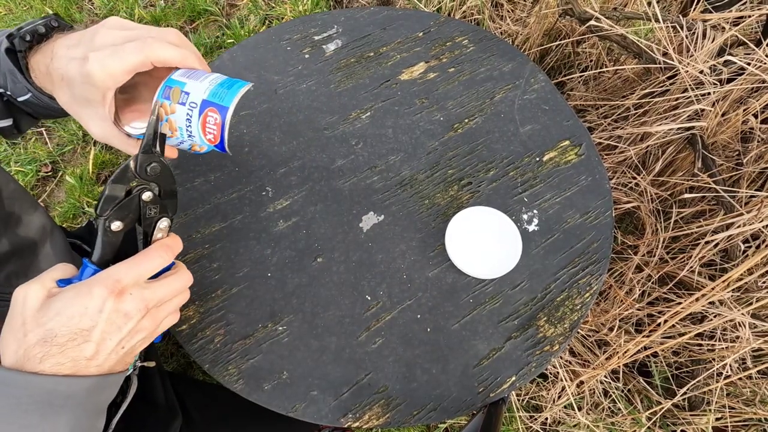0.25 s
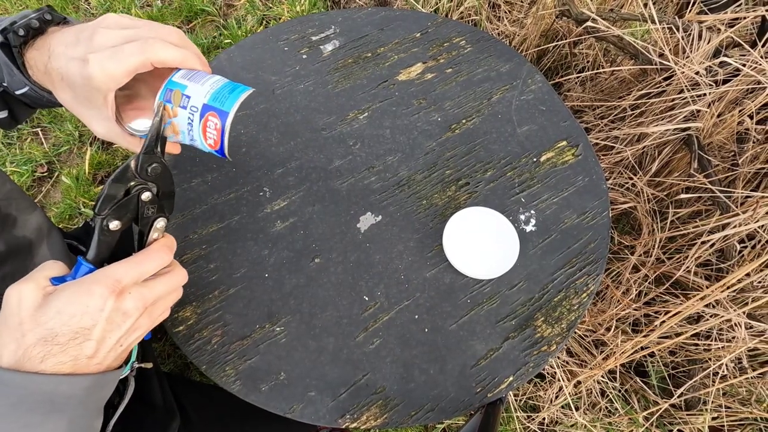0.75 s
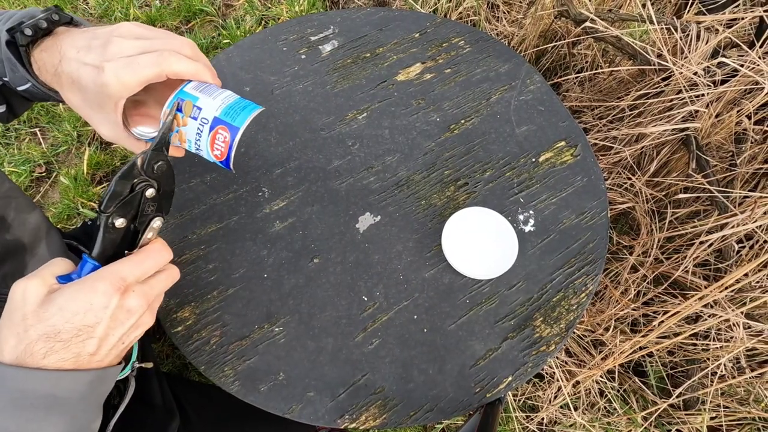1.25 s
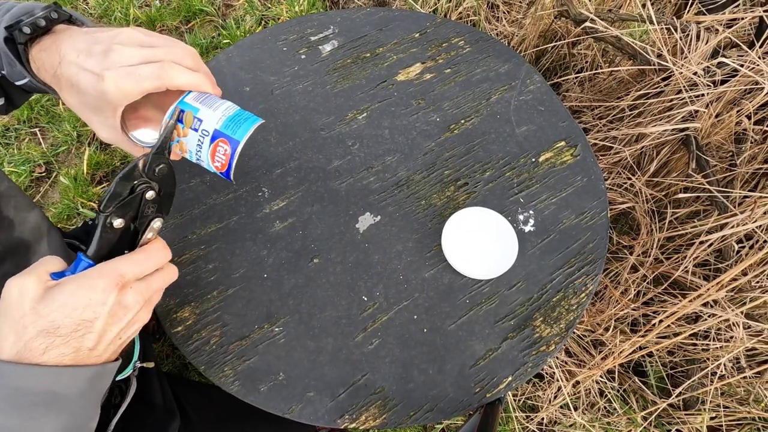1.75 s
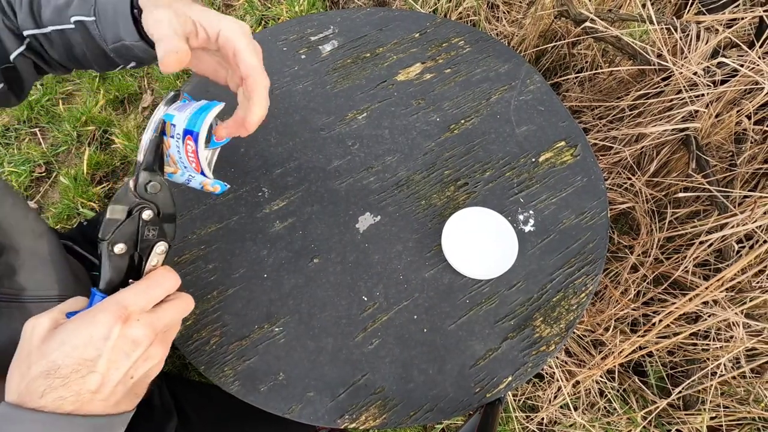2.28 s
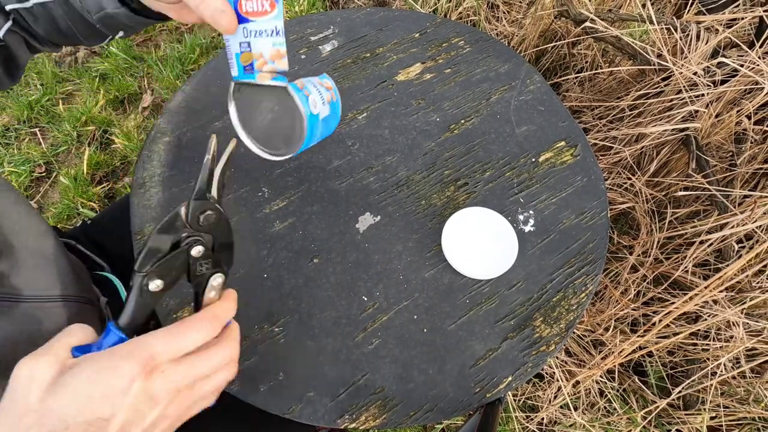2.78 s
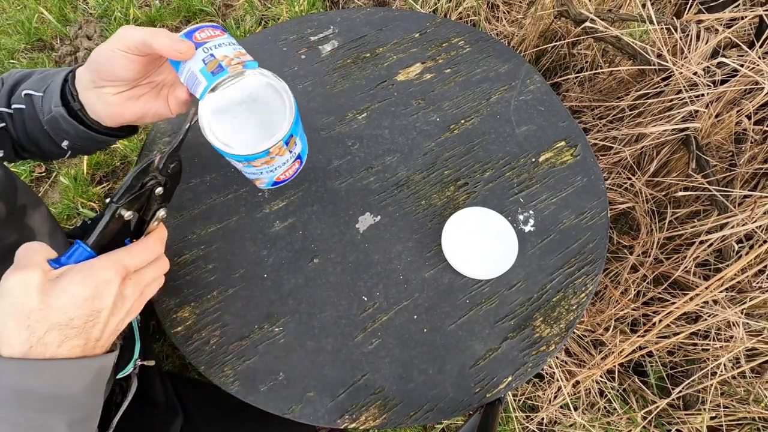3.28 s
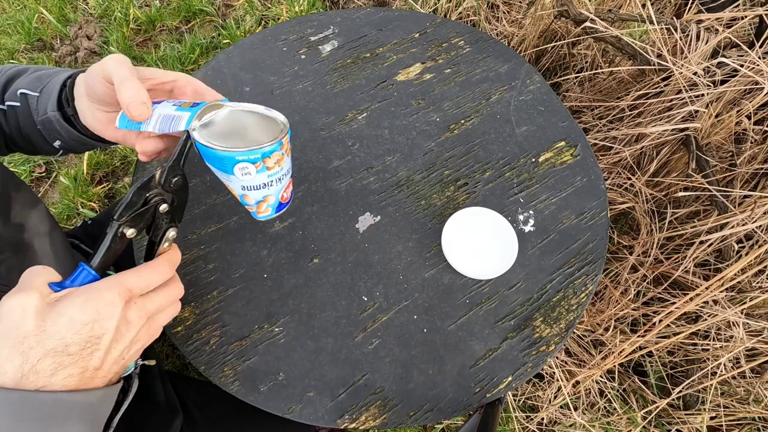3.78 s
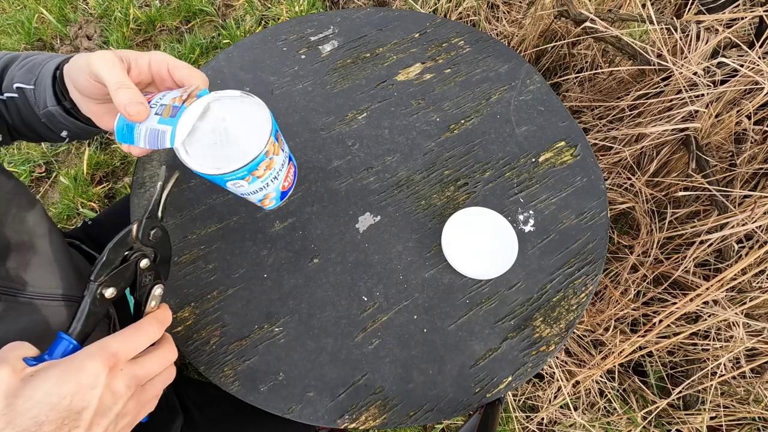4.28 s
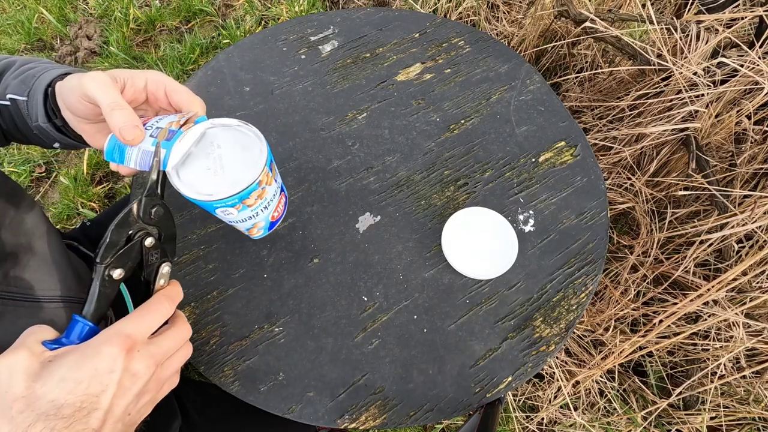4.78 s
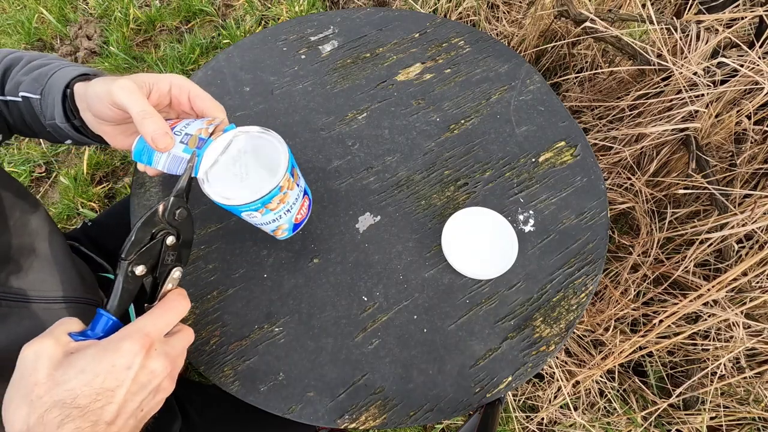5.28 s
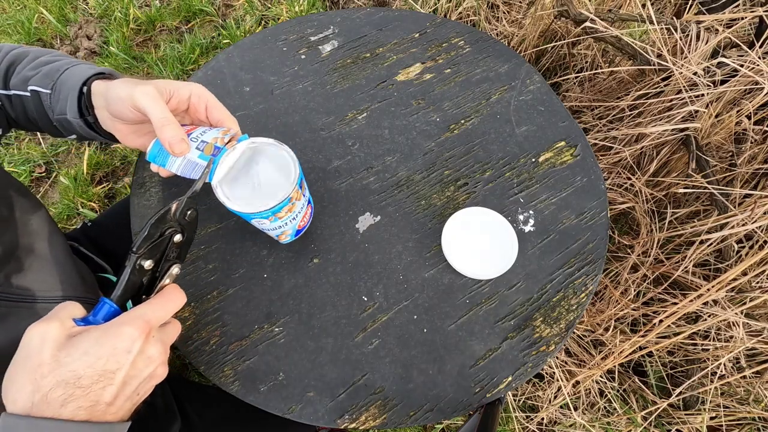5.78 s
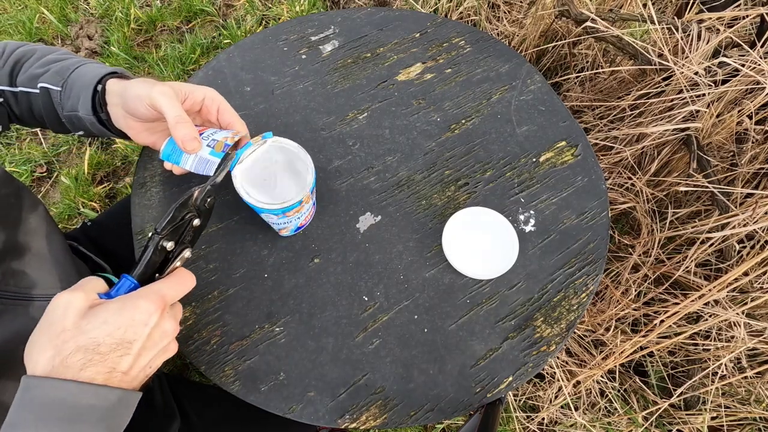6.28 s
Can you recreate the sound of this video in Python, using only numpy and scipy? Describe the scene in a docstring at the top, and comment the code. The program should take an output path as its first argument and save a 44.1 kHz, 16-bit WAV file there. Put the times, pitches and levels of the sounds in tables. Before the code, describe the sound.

A close outdoor scene of snips cutting a thin steel can above a wooden table, over soft distant tyre roar, low rumble and faint hiss. From 0.1 to 1.6 s come dry, irregular jaw clacks with little scrapes; the hardest, near 0.67, 0.86 and 1.45 s, are piercing, the first with a thump in the handles. A faint rub follows at 1.9 s. From 2.1 to 4.2 s it is mostly quiet: tiny crinkles, light rubbing, hollow tin pops, clearest at 3.3 and 4.0 s. The road dips around 2.5 s, then slowly swells, and the stereo widens from near mono. A small crack and shear comes at 4.7 s, lighter ones at 5.2, then strong crunching cracks at 5.6 and 6.05 s. From 6.2 s the can drops, bouncing and rattling until the end, hardest near 6.37 s, with short dull table booms slightly right.

```python
"""Tin snips on a can

Tin snips cut a strip from a thin steel can, outdoors, close over a wooden table.
Jaw clacks, sheet cracks and wall buckles are coloured noise bursts over damped ringing modes.
Scrapes and shears are clumps of stick-slip ticks and hiss, heard through the sheet's shimmer.
At last the can drops and bounces: its rim rattles and the table top booms.
Behind lies shaped noise: the tyre roar of a far road, a low rumble and a faint hiss."""
import sys
import numpy as np
from scipy import signal
from scipy.fft import rfft, irfft, next_fast_len
from scipy.io import wavfile
from scipy.ndimage import map_coordinates

SR = 44100
rng = np.random.default_rng(int(sys.argv[2]) if len(sys.argv) > 2 else 0)


def digitize_waveform(pressure):
    """Quantize a signal to 16-bit integers and store it at the path in sys.argv[1].

    Rows of a 2-D input are taken as channels; values are limited to [-1, 1].
    """
    field = np.atleast_2d(pressure).T
    bounded = np.clip(field, -1, 1)
    quanta = np.round(bounded * 32767).astype(np.int16)
    wavfile.write(sys.argv[1], SR, quanta)


N = 288414

# jaws snapping shut: start_s, level_db, main_resonance_hz, bass_shelf_db (more where they bear on the can)
CLACKS = [(0.0958, -23, 1520, -6.5), (.148, -9.5, 2380, -15), (.422, -27, 1700, -1),
          (0.6189, -18, 2780, -14.5), (0.6247, -23.5, 2670, -22), (0.631, -10.5, 2392, -11),
          (.672, 2, 2690, -14), (0.8564, -1, 3150, -23.5), (1.164, -27, 1055, -7), (1.195, -22.5, 1270, -1),
          (1.251, -16.5, 1390, -10), (1.277, -23, 1930, -9.5), (1.391, -7.5, 884, -9),
          (1.4474, 1.5, 3950, -11.5), (1.5169, -20.5, 2960, -3.5), (1.548, -23.5, 2850, -8),
          (1.568, -32.5, 3180, -32), (1.587, -18, 834, -0.5)]
# sheet cracking under the blades: start_s, level_db, main_resonance_hz
CRACKS = [(4.7396, -20, 2237), (5.154, -29, 2080), (5.201, -20.5, 2120), (5.2505, -21, 1820),
          (5.3373, -21, 2000), (5.5811, -7.5, 2024), (5.6007, -8, 2010), (5.6204, -3.5, 2220),
          (5.834, -21.5, 2170), (5.903, -17.5, 1730), (5.934, -21.5, 1650), (6.0493, -6.5, 2096),
          (6.0811, -12, 2480), (6.1972, -18.5, 1780), (6.273, -17, 5200)]
# can wall buckling or being knocked: start_s, level_db, main_resonance_hz, ring_db (relative)
BUCKLES = [(2.102, -35.5, 1450, -25), (2.538, -34.5, 1650, -30), (2.6518, -36.5, 1730, -17),
           (2.7067, -39, 1690, -5.5), (3.0923, -44, 1190, -23), (3.28, -33.5, 1390, -6.5),
           (3.3099, -18.5, 2860, -8), (3.4407, -31, 1205, 2), (3.529, -29.5, 1670, -2.5),
           (3.8471, -29, 1560, -6), (3.9751, -34, 1227, 1), (3.983, -19.5, 1150, -7.5),
           (5.6354, -7.5, 1240, -22.5), (6.1135, -10.5, 1193, -17)]
# can landing on the table: start_s, can_level_db, table_boom_db
DROPS = [(6.211, -9, -20), (6.283, -21.5, -23.5), (6.343, -14.5, -25), (6.3653, -3.5, -14),
         (6.43, -18.5, -30.5), (6.532, -9, -20)]
# blades rubbing along the sheet: start_s, length_s, level_db, main_resonance_hz
SCRAPES = [(0.137, 0.07, -33.5, 2872), (0.44, 0.052, -39, 1700), (0.618, 0.012, -36.5, 486),
           (1.19, 0.06, -36, 1950), (1.553, 0.057, -41, 3170), (1.858, 0.073, -35.5, 521),
           (2.095, 0.15, -62.5, 1470), (2.515, .08, -49.5, 3780), (2.66, 0.12, -53.5, 1720),
           (3.062, 0.05, -58, 4890), (3.431, 0.23, -50.5, 3160), (3.703, .1, -48.5, 4570),
           (3.886, 0.17, -44.5, 3100), (4.138, 0.06, -49.5, 3160), (5.265, 0.15, -47.5, 2050),
           (5.851, .11, -44.5, 1780), (6.227, 0.29, -42.5, 1460)]
# blades shearing through the sheet: start_s, length_s, level_db, main_resonance_hz
SHEARS = [(4.731, .08, -38, 2220), (5.586, 0.076, -34.5, 1950), (5.629, 0.011, -23.5, 1220),
          (6.058, .027, -24.5, 2680), (6.078, 0.036, -22, 2450)]

# ringing modes of the snips: mode_hz, relative_level_db, t60_s
TOOL_MODES = [(444, -2, .05), (850, -7.5, 0.039), (1228, 1, 0.11), (1715, -2, 0.17), (1854, -8, 0.21),
              (2450, -8, 0.18), (2804, 3, 0.092), (3090, -11, 0.19), (3700, -9.5, 0.19), (3823, -19, 0.072),
              (3997, -6.5, 0.071), (4674, -18.5, 0.072), (4650, -21.5, .12), (5250, -9.5, 0.11),
              (5870, -27.5, 0.078), (6500, -17.5, 0.045), (7760, -24, 0.055)]
# ringing modes of the can during the cut: mode_hz, relative_level_db, t60_s
CAN_MODES = [(431, 3.5, 0.18), (450, 2, 0.25), (644, -13.5, 0.16), (1165, 6.5, 0.13), (1257, -1, 0.15),
             (1743, -7, 0.26), (1950, -22, .12), (2260, -8.5, 0.37), (2300, -12, 0.33), (2470, -13, 0.1),
             (3000, 3, 0.12), (3340, -37.5, 0.078), (3520, -16.5, 0.31), (3560, -45, 0.37),
             (4650, -12.5, .12), (4900, -39, 0.12), (5530, -27.5, 0.25), (7140, -18, 0.081)]
# ringing modes of the can once it has dropped: mode_hz, relative_level_db, t60_s
FALLEN_CAN_MODES = [(442, 3, 0.156), (597, -12, 0.04), (796, -11, .12), (968, 5.5, .12), (1158, 11, 0.11),
                    (1275, 13, 0.21), (1424, -7, 0.22), (1720, -8, .15), (2300, -14, 0.27),
                    (2620, -7, 0.24), (3429, -15.5, .2), (5250, -24.5, 0.19)]
# booming modes of the table top: mode_hz, relative_level_db, t60_s
TABLE_MODES = [(83, -18, 0.7), (127.6, -1.5, 0.24), (141.7, 2.5, 0.28), (235.5, -7, 0.43),
               (293.6, -8, 0.079), (631, -17.5, 0.36)]

# timbre of a jaw clack, before its shelves and peak: frequency_hz, gain_db
CLACK_COLOUR = [(60, -15.5), (300, -5.5), (900, 18), (1600, 4.5), (2700, 9), (4000, 5.5), (5200, 8.5),
                (7500, 15.5), (9500, -1), (13000, -8.5), (16000, -17.5)]
# timbre of cracking or buckling tin, before its shelves and peak: frequency_hz, gain_db
TIN_COLOUR = [(60, -11), (300, -2), (1000, 14.5), (2000, 8.5), (3000, 7.5), (4500, -7.5), (6000, 6),
              (8000, 4), (9500, -17.5), (13000, -12.5), (16000, -24.5)]
# timbre of the can's rim on the table: frequency_hz, gain_db
RIM_COLOUR = [(20, -23), (60, -3), (200, 10), (700, 2), (1200, 6), (2000, -8), (3500, -13), (7000, -25.5),
              (12000, -54), (16000, -69)]
# timbre of a scrape, before its shelves and peak: frequency_hz, gain_db
SCRAPE_COLOUR = [(100, -13), (450, 10), (900, 1.5), (1700, 12), (3000, 7.5), (5000, 4), (7500, 2),
                 (9500, -12.5), (13000, -19.5), (14500, -22.5), (16000, -46)]
# timbre of a shear, before its shelves and peak: frequency_hz, gain_db
SHEAR_COLOUR = [(100, -46), (450, -12), (700, -3), (1200, 10), (2300, 7.5), (3200, 0.5), (4200, -1),
                (6000, -4.5), (8000, -4), (9500, -18), (13000, -20), (16000, -64)]
# timbre of the thump in the handles: frequency_hz, gain_db
JOLT_COLOUR = [(20, -46), (50, -14.5), (90, -6.5), (150, -4), (260, -9), (450, -8.5), (900, -33.5),
               (2500, -40)]

# rise and fall of the far road: time_s, level_db (before trim and wobble)
ROAD_LEVEL = [(0.0, -48.5), (1.03, -48.5), (1.38, -46.5), (1.79, -45), (2.27, -55), (2.76, -57),
              (3.28, -52), (3.45, -52), (4.43, -49), (6.05, -46.5)]
# spectral shape of the low rumble: frequency_hz, relative_level_db
RUMBLE_COLOUR = [(12, -48.5), (20, -25.5), (70, -2), (134, 5), (167, 0.5), (226, -1.5), (308, -13.5),
                 (351, -18.5), (450, -35.5), (580, -66), (990, -120)]
# spectral shape of the tyre roar: frequency_hz, relative_level_db
ROAD_COLOUR = [(210, -37), (350, -13), (470, -20.5), (620, -17), (860, -3.5), (1200, 0.5), (1700, -11),
               (2300, -18.5), (3300, -32.5), (5000, -43), (9000, -63)]
# spectral shape of the faint hiss: frequency_hz, relative_level_db
HISS_COLOUR = [(1500, -20), (3500, 0), (6800, -1), (8600, -10), (14500, -15), (16000, -30)]
# the background's diffuse share in the side signal: frequency_hz, gain_db
AIR_SIDE = [(60, -15.5), (250, -7.5), (450, -1), (1200, -7.5), (2500, -2), (5000, -7)]

# level between the microphone ports at full width: frequency_hz, left_minus_right_db
PORT_LEVEL = [(100, 6.5), (450, -3.5), (800, -1), (1500, 5), (3000, 5), (5000, 12.5), (9000, 18.5),
              (14000, 6)]
# phase between the ports at full width: frequency_hz, left_lead_rad
PORT_PHASE = [(80, -.1), (350, -1.1), (2500, -1.1), (5000, -.5), (9000, -.7)]
# diffuse share between the ports: frequency_hz, gain_db
PORT_DIFFUSE = [(80, -19), (1200, -12.5), (3000, -13.5), (9000, -8.5)]
# opening of the stereo image: time_s, width_0_to_1
WIDTH = [(1.95, 0.01), (2.2, 0.21), (2.7, 0.87)]

T = np.arange(SR // 4) / SR  # time axis of one short sound (s)
GRIP_ENDS_S = 2.45  # until then the hand damps the can, so strokes ring in the tool
FIRM_DB, PRESS_DB = -15, -45  # a contact of ordinary force; a stroke of ordinary pressure
REBOUND_S, REBOUND_LOSS_DB = 0.024, 10  # after each landing the can rocks onto its other edge
SEAT_S, SEAT_DB = 0.055, -16  # before each scrape the blades slide lightly into place
RUMBLE_BASE_DB, RUMBLE_FOLLOWS = -50.5, 0.87  # mean rumble level; its dB for each dB of traffic
HISS_DB, HISS_FOLLOWS = -87.5, 0.6  # mean hiss level; its dB for each dB of traffic


def clacking():
    """The jaws snap shut: the harder, the shorter and brighter, with less of the sound in the ring."""
    track = np.zeros(N)
    for s, db, main_hz, body_db in CLACKS:
        hard = db - FIRM_DB
        clack = blow(CLACK_COLOUR, TOOL_MODES, main_hz,
                     bass_db=body_db, treble_db=-24 + 0.35 * hard,
                     t60=0.031 * np.exp(-0.022 * hard), ring_db=-19.5 - 0.31 * hard, crack_db=-10.5,
                     peak_db=10, peak_octaves=0.085, tail_db=-22.5, tail_t60=0.12)
        add(track, s, amp(db) * clack)
    return track


def jolt(s=0.6735, db=-14, t60=0.0084):
    """The jaws break through the rim and the handles thump in the hand."""
    track = np.zeros(N)
    thump = fade(t60) * np.cos(2 * np.pi * 190 * T)
    push = coloured(thump, lambda hz: along(JOLT_COLOUR, hz))
    add(track, s, -amp(db) * push / np.abs(push).max())
    return track


def cracking():
    """The sheet gives way: big cracks are thin and bright, small ones keep more of the can's body."""
    track = np.zeros(N)
    for s, db, main_hz in CRACKS:
        hard = db - FIRM_DB
        snap = blow(TIN_COLOUR, CAN_MODES, main_hz,
                    bass_db=-8 - 1.1 * hard, treble_db=-15 + 0.64 * hard,
                    t60=0.018, ring_db=-27.5 - 0.2 * hard, crack_db=-13.5,
                    peak_db=8.5, peak_octaves=0.12, tail_db=-20, tail_t60=0.12)
        add(track, s, amp(db) * snap)
    return track


def shearing():
    """The cut runs forward in many tiny fractures, brighter as the force grows."""
    track = np.zeros(N)
    for s, length, db, main_hz in SHEARS:
        press = db - PRESS_DB
        shear = stroke(s, length, SHEAR_COLOUR, main_hz,
                       bass_db=6.5, treble_db=-14 + 1.16 * press,
                       rate=300, spread_db=4.0, hiss=0.3, swell=0.093,
                       sheet_db=16, sheet_t60=0.073, ring_db=-7.5, peak_db=15.5)
        add(track, s, amp(db) * shear)
    return track


def scraping():
    """The blades seat, then grind along the sheet; pressure turns sparse, dry ticks into a full crunch."""
    track = np.zeros(N)
    for s, length, level_db, main_hz in SCRAPES:
        seat = min(SEAT_S, length)
        for start, span, db in [(s - seat, seat, level_db + SEAT_DB), (s, length, level_db)]:
            press = db - PRESS_DB
            scrape = stroke(start, span, SCRAPE_COLOUR, main_hz,
                            bass_db=2 + 0.39 * press, treble_db=-8.5 - 0.23 * press,
                            rate=300 * amp(0.26 * press), spread_db=4.5, hiss=0.46, swell=0.59,
                            sheet_db=-2 + 0.3 * press, sheet_t60=0.07, ring_db=-7.5, peak_db=9)
            add(track, start, amp(db) * scrape)
    return track


def buckling():
    """The wall pops over and sets the can ringing; light crinkles are the brightest."""
    track = np.zeros(N)
    for s, db, main_hz, ring_db in BUCKLES:
        hard = db - FIRM_DB
        pop = blow(TIN_COLOUR, CAN_MODES, main_hz,
                   bass_db=-3.5, treble_db=-27.5 - 0.77 * hard,
                   t60=0.02, ring_db=ring_db, crack_db=-6,
                   peak_db=12.5, peak_octaves=0.1, tail_db=-14.5, tail_t60=0.14)
        add(track, s, amp(db) * pop)
    return track


def landing(can_db=-5.5, rim_db=-11.0, pan_db=-5, count=2):
    """Each landing and its rebound rattle the freed can and boom in the table top, which lies to the right."""
    can, table = np.zeros(N), np.zeros(N)
    for s, db, boom_db in DROPS:
        for k in range(count):
            start = s + k * REBOUND_S
            rim = crack(lambda hz: along(RIM_COLOUR, hz), t60=0.029, tail_db=-15.5, tail_t60=0.17)
            hit = amp(can_db) * ring(FALLEN_CAN_MODES) + amp(rim_db) * rim
            rattle = signal.fftconvolve(chatter(), hit)
            add(can, start, amp(db - k * REBOUND_LOSS_DB) * rattle)
            add(table, start, amp(boom_db) * ring(TABLE_MODES))
    # roll the table boom off below 75 Hz
    table = coloured(table, lambda hz: along([(20, -28), (45, -9), (75, 0)], hz), size=8192)
    return can, table * amp([[pan_db / 2], [-pan_db / 2]])


def chatter(rate=200, db=-7, t60=0.095):
    """One impact followed by the small, uneven hits of a rim that keeps rattling."""
    struck = rng.random(len(T)) < rate / SR
    hits = struck * rng.standard_normal(len(T)) * amp(db) * fade(t60)
    hits[0] = 1
    return hits


def blow(colour, modes, main_hz, bass_db, treble_db, t60, ring_db, crack_db,
         peak_db, peak_octaves, tail_db, tail_t60):
    """One metal contact; where the blades grip sets the strongest resonance."""
    timbre = voiced(colour, main_hz, bass_db, treble_db, peak_db, peak_octaves)
    return amp(crack_db) * crack(timbre, t60, tail_db, tail_t60) + amp(ring_db) * ring(modes)


def crack(gain_db, t60, tail_db, tail_t60, size=220):
    """A contact: a burst that dies at once, then the shimmer; rms 1 over the first size samples."""
    burst = rng.standard_normal(len(T)) * fade(t60)
    sound = coloured(burst + amp(tail_db) * shimmer(tail_t60), gain_db)
    return sound / np.sqrt(np.mean(sound[:size] ** 2))


def ring(modes, scatter_db=5.5):
    """Damped modes of joint amplitude 1; each blow shares its force among them anew."""
    hz, db, t60 = np.transpose(modes)
    size = amp(db + scatter_db * rng.standard_normal(len(hz)))
    size = size * rng.choice([-1, 1], len(hz))
    tones = sum(g * np.sin(2 * np.pi * f * T) * fade(d) for g, f, d in zip(size, hz, t60))
    return tones / np.linalg.norm(size)


def shimmer(t60, spacing_hz=55, spread_db=4, damped_hz=7500):
    """The crowd of weak modes in thin steel, different wherever touched; rms 1 before its decay."""
    hz = np.fft.rfftfreq(len(T), 1 / SR)
    present = rng.random(len(hz)) < hz[1] / spacing_hz
    lines = present * amp(spread_db * rng.standard_normal(len(hz)))
    lines = lines / (1 + (hz / damped_hz) ** 4)  # the highest modes hardly sound
    phases = np.exp(2j * np.pi * rng.random(len(hz)))
    return unit(irfft(lines * phases, len(T))) * fade(t60)


def stroke(start, length, colour, main_hz, bass_db, treble_db, rate, spread_db, hiss, swell,
           sheet_db, sheet_t60, ring_db, peak_db):
    """Friction sounds directly, through the sheet's shimmer, and in the tool or can; rms 1 over the stroke."""
    n = max(int(length * SR), 64)
    force = slips(n, rate, spread_db, hiss, swell)
    answer = lambda response: unit(signal.fftconvolve(force, response)[:len(force)])
    timbre = voiced(colour, main_hz, bass_db, treble_db, peak_db, peak_octaves=0.099)
    sheet = unit(coloured(unit(force) + amp(sheet_db) * answer(shimmer(sheet_t60)), timbre))
    modes = TOOL_MODES if start < GRIP_ENDS_S else CAN_MODES
    sound = sheet + amp(ring_db) * answer(ring(modes))
    return unit(sound) * np.sqrt(n / len(force))


def slips(n, rate, spread_db, hiss, swell, clump_db=4.5, clumps_per_s=150):
    """Stick-slip over n samples: uneven ticks and fine hiss come in clumps, with silence after."""
    ticks = (rng.random(n) < rate / SR) * rng.choice([-1, 1], n)
    ticks = ticks * amp(spread_db * rng.standard_normal(n))
    knots = rng.standard_normal(64)
    clumps = amp(clump_db * np.interp(np.arange(n) * clumps_per_s / SR, np.arange(64), knots))
    friction = (unit(ticks) + hiss * rng.standard_normal(n)) * clumps * np.hanning(n) ** swell
    return np.pad(friction, (0, len(T)))


def voiced(colour, main_hz, bass_db, treble_db, peak_db, peak_octaves):
    """A contact's gain curve: its timbre with a bass shelf, a treble shelf and one resonant peak."""
    def gain_db(hz):
        shelves = bass_db * bass(hz) + treble_db * treble(hz)
        return along(colour, hz) + shelves + peak_db * bump(hz, main_hz, peak_octaves)
    return gain_db


def bass(hz):
    """Share 0-1 of a bass shelf."""
    return along([(1000, 0.98), (1700, 0.15)], hz)


def treble(hz):
    """Share 0-1 of a treble shelf."""
    return along([(4500, 0), (7500, 1)], hz)


def bump(hz, centre_hz, octaves):
    """Shape 0-1 of one resonance, at half height the given octaves off centre."""
    return 1 / (1 + (np.log2((hz + 1) / centre_hz) / octaves) ** 2)


def outdoors(trim_db=1.1):
    """A far road's tyre roar, with a rumble and a hiss that follow it: (frontal part, diffuse side part)."""
    road_db, = curves(ROAD_LEVEL)
    swing_db = road_db - road_db.mean()
    rumble_db = RUMBLE_BASE_DB + RUMBLE_FOLLOWS * swing_db + 0.42 * wobble(13)
    rumble = amp(rumble_db) * background_noise(RUMBLE_COLOUR)
    road = amp(road_db + trim_db + 1.6 * wobble(7)) * background_noise(ROAD_COLOUR)
    hiss = amp(HISS_DB + HISS_FOLLOWS * swing_db) * background_noise(HISS_COLOUR)
    mid, around = rumble + road + hiss
    width, = curves(WIDTH)
    return mid, width * filtered(around, lambda hz: amp(along(AIR_SIDE, hz)))


def background_noise(spectrum):
    """Two independent channels of steady noise with the given spectral shape, rms 1."""
    return unit(filtered(rng.standard_normal((2, N)), lambda hz: amp(along(spectrum, hz))))


def ports(mid):
    """Two microphone ports differ in level and phase; the image opens from nearly mono to wide."""
    ratio = lambda hz: amp(along(PORT_LEVEL, hz)) * np.exp(1j * along(PORT_PHASE, hz))
    direct = filtered(mid, lambda hz: (ratio(hz) - 1) / (ratio(hz) + 1))
    scatter = rng.standard_normal(len(T)) * fade(0.07)  # paths off the table and the hands
    scattered = signal.oaconvolve(mid, scatter / np.linalg.norm(scatter))[:N]
    diffuse = filtered(scattered, lambda hz: amp(along(PORT_DIFFUSE, hz)))
    width, = curves(WIDTH)
    side = width * (direct + diffuse)
    return np.array([mid + side, mid - side])


def amp(db):
    """Decibels to gain."""
    return 10 ** (np.asarray(db) / 20)


def unit(x):
    """Scale to rms 1."""
    return x / np.sqrt(np.mean(x ** 2) + 1e-20)


def along(points, hz):
    """Read (Hz, value) points on a log frequency axis."""
    f, v = np.transpose(points)
    return np.interp(np.log(hz + 1), np.log(f + 1), v)


def curves(rows):
    """One value per sample for each column after the time."""
    s, *cols = np.transpose(rows)
    return [np.interp(np.arange(N) / SR, s, c) for c in cols]


def wobble(rate):
    """A smooth random curve, rate knots a second."""
    knots = rng.standard_normal(int(N * rate / SR) + 4)
    return map_coordinates(knots, [np.arange(N) * rate / SR])


def fade(t60):
    """Exponential decay from 1, down 60 dB after t60 seconds."""
    return np.exp(-np.log(1000) * T / max(t60, 1e-3))


def filtered(x, response):
    """Filter x by a complex response of frequency."""
    n = x.shape[-1]
    m = next_fast_len(n + SR // 4)
    return irfft(rfft(x, m) * response(np.fft.rfftfreq(m, 1 / SR)), m)[..., :n]


def coloured(x, gain_db, size=2048):
    """Causal (minimum-phase) filter with a dB gain that depends on frequency."""
    cepstrum = irfft(np.log(amp(gain_db(np.fft.rfftfreq(size, 1 / SR)))))
    cepstrum[1:size // 2] *= 2  # fold the cepstrum onto positive time
    cepstrum[size // 2 + 1:] = 0
    impulse = irfft(np.exp(rfft(cepstrum)))
    return signal.fftconvolve(x, impulse)[:len(x)]


def add(track, s, sound):
    """Mix a sound into the track at time s."""
    part = track[max(round(s * SR), 0):][:len(sound)]
    part += sound[:len(part)]


def scene():
    """Tool, can, table and background at the microphone."""
    can, table = landing()
    air, around = outdoors()
    cutting = clacking() + jolt() + cracking() + shearing() + scraping() + buckling()
    return ports(cutting + can + air) + table + np.array([around, -around])


def record(dry):
    """Peaks clip at full scale; then the treble fades out from 14900 to 16100 Hz."""
    return filtered(np.clip(dry, -1, 1), lambda hz: np.clip((16100 - hz) / 1200, 0, 1))


dry = scene()
out = record(dry)
digitize_waveform(out)
```